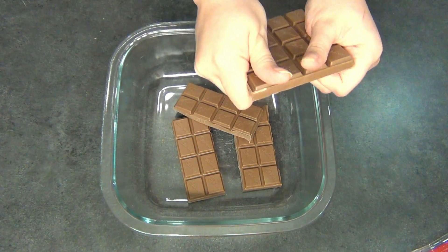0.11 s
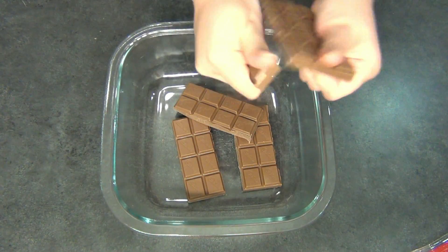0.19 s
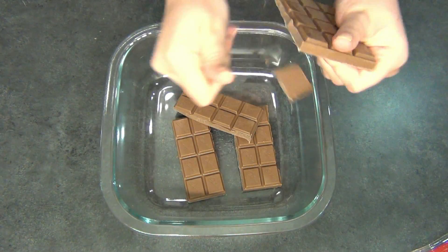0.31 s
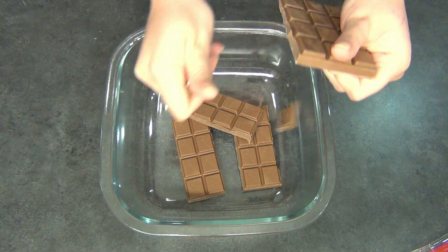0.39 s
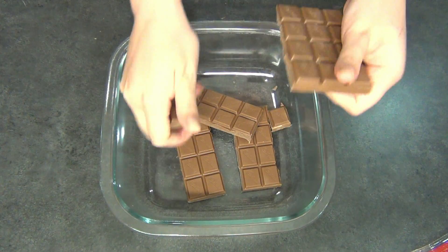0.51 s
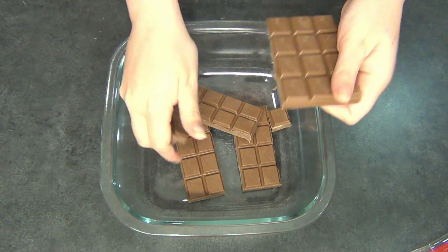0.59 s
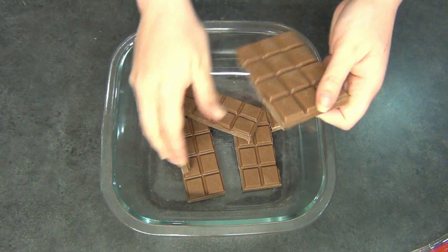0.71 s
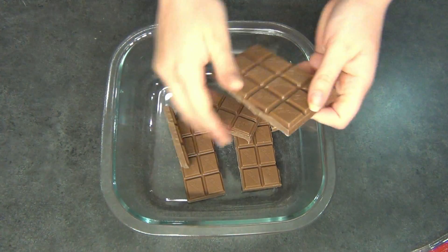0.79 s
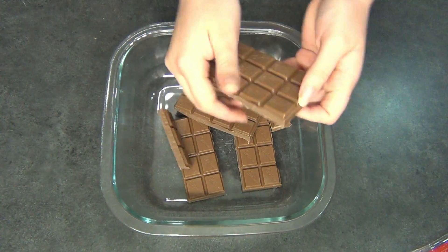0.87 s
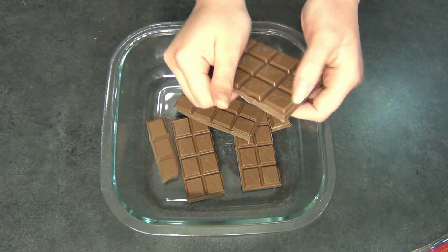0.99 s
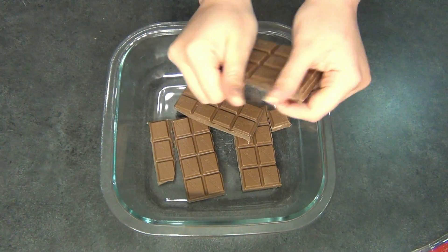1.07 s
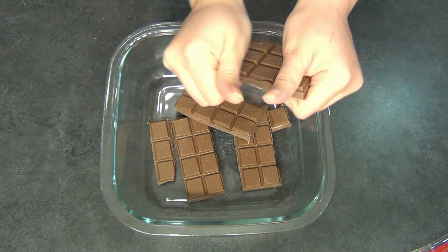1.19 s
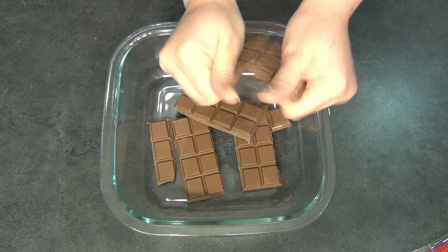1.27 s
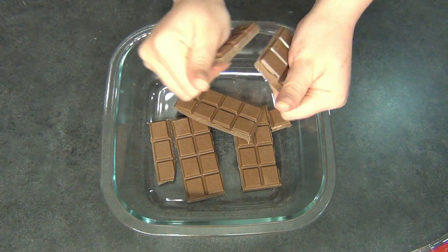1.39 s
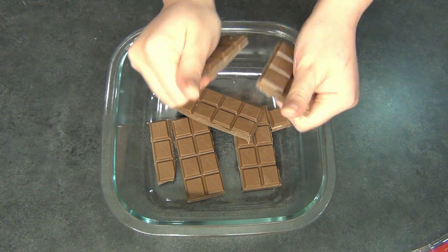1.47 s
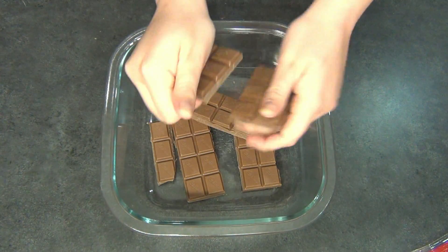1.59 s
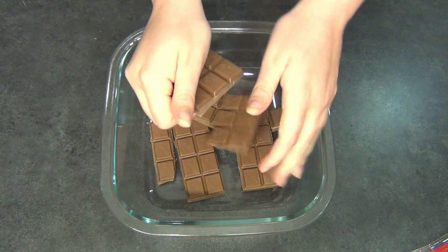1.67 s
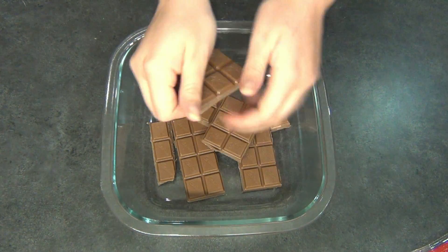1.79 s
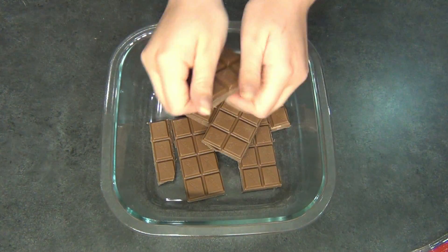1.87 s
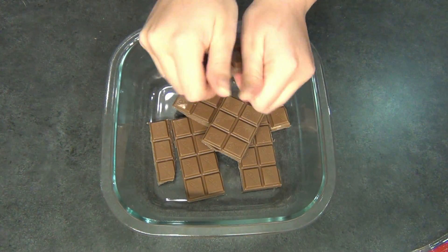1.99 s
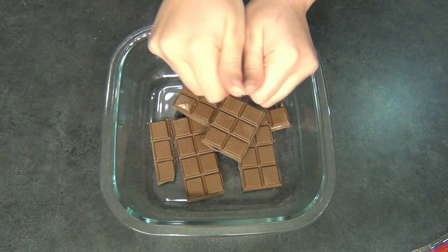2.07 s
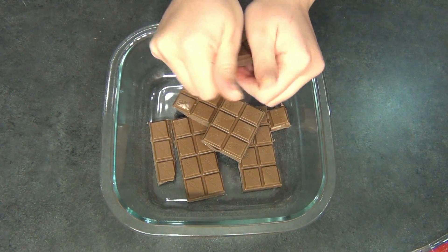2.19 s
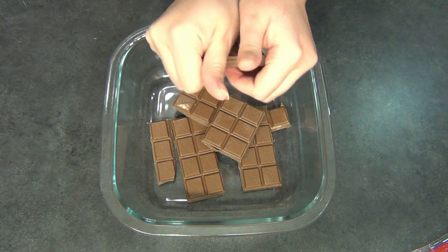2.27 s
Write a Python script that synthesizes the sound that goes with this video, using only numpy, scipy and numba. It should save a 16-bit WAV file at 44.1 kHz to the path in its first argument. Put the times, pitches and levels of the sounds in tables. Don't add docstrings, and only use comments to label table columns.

```python
import sys
import numpy as np
from scipy import signal
from scipy.fft import rfft, irfft
from scipy.io import wavfile
from numba import njit

SR = 44100
rng = np.random.default_rng(int(sys.argv[2]) if len(sys.argv) > 2 else 0)


def convert_level_to_amplitude(level_db):
    exponent = np.asarray(level_db, float) / 20
    return 10 ** exponent


def master_out(mix):
    frames = np.transpose(np.atleast_2d(mix))
    ceiling = np.clip(frames, -1, 1)
    pcm = np.round(ceiling * 32767).astype(np.int16)
    wavfile.write(sys.argv[1], SR, pcm)


N = 101430

# pitch_hz, level_db [dB per Hz]
AIR = [(25, -14), (76, -13.5), (170, 0.5), (249, -9), (317, -2), (591, -6.5), (863, -12), (2990, -23.5),
       (16000, -25.5)]
# pitch_hz, side_against_mid_db
AIR_WIDTH = [(100, -34), (380, -21.5), (1300, -5), (8000, -7.5), (15000, -10)]
# pitch_hz, level_db
FRIDGE_TONES = [(99, -57), (202, -53.5), (305, -65), (497, -103)]
# pitch_hz, level_db, t60_s
ROOM_OCTAVES = [(120, -4, 0.7), (234.4, -2.5, 0.53), (528, -0.5, 0.81), (953, -1.5, 0.96),
                (1822, -3.5, 0.85), (3600, -9.5, 0.78), (5230, -18, 0.85), (7500, -13.5, 0.63),
                (10500, -14, 0.31), (14400, -35.5, 0.25)]
# pitch_hz, level_db, t60_s
COUNTER_MODES = [(92.9, -12.5, 0.398), (158, -35, 0.035), (189.7, 0.5, 0.1), (220.5, 8.5, 0.051),
                 (261, 3.5, 0.075), (317, 0.5, 0.03), (469, 3.5, 0.021)]
# start_s, level_db
THUDS = [(0.484, -20), (0.511, -22.5), (.72, -21), (0.733, -24.5), (.756, -7.5), (0.78, -25.5),
         (.862, -13.5), (.925, -18), (0.969, -22.5), (1.027, -25), (1.075, -20.5), (1.132, -15.5),
         (1.147, -19.5), (1.2, -21), (1.757, -4.5), (1.781, -14), (1.798, -10), (1.836, -8)]
# start_s, level_db, centre_hz, t60_s
RATTLES = [(.477, -18.5, 10000, 0.18), (0.509, -23.5, 4760, 0.68), (0.768, -12.5, 2950, 0.31),
           (.86, -19.5, 2920, 0.57), (1.369, -31.5, 2620, 0.43), (.25, -30.5, 2780, 0.67),
           (1.097, -21.5, 2400, 0.26), (1.098, -9.5, 5600, 0.054), (1.761, -9.5, 3130, 0.069),
           (1.761, -18, 570, 0.38), (1.812, -14.5, 3400, 0.12), (1.82, -26.5, 1580, 0.54)]
GLASS_HZ = [840, 1530, 1590, 1696, 2370, 2862, 3095, 3938, 4510, 5060, 5430, 5740, 6600, 8270]
TWIN_SPLIT = [0.00043, 0.0025, .004, 0.0013, 0.001, 0.0022, 0.0033, 0.01, 0.0037, 0.0031, 0.0049, 0.0039,
              .003, .003]
# level_db, t60_s
BOTTOM_ANSWER = [(-33, 0.14), (-10, 0.61), (-27, 0.48), (2, 0.11), (-6, 0.14), (-8, 0.31), (-18, 0.12),
                 (7.5, 0.052), (-26, 0.22), (-23, 0.18), (-23, 0.25), (-31, .25), (-32, 0.32), (-26, 0.08)]
# level_db, t60_s
WALL_ANSWER = [(-1, 0.74), (-37, 0.5), (-18, 0.48), (-28, 0.2), (10, 0.15), (-5.5, 1.3), (-10, 0.46),
               (-18, 0.3), (-9, 0.4), (-3.5, 0.51), (-14, 0.68), (-13, 0.53), (-21, 0.33), (-32, 0.2)]
# pitch_hz, level_db, t60_s
SHIMMER_MODES = [(4470, -7, 0.11), (4810, -8, 0.13), (6150, -7.5, 0.22), (7040, -19, 0.095),
                 (7240, -11, 0.3), (8100, -7, 0.082), (8580, -6.5, 0.15), (9400, -19, 0.21),
                 (9800, -4.5, 0.12), (10300, -19, 0.091), (11500, -10, 0.094), (12400, -6, 0.1)]
# pitch_hz, level_db, t60_s
BOTTOM_CLACK = [(1571, 0, 0.017), (2270, -65, 0.0092), (2953, 0.5, 0.017), (3927, 0.5, 0.014),
                (4480, -18, 0.052), (5910, -19, 0.042), (7960, -11.5, 0.013), (10000, -31, 0.026),
                (12740, -43, 0.037), (13500, -39, 0.0067)]
# pitch_hz, level_db, t60_s
WALL_CLACK = [(1640, -28, 0.052), (2270, -10.5, 0.041), (2848, -7.5, 0.1), (3954, 3, 0.043),
              (5020, -12.5, 0.054), (5700, -13, 0.047), (9200, -39, 0.027), (9970, -21.5, 0.032),
              (12500, -28, 0.04), (14300, -40, 0.065)]
# start_s, level_db, pitch_hz
CLICKS = [(.2409, 3, 9100), (1.3633, 4, 11000), (0.48, -16, 4000), (0.5103, -6, 3030),
          (0.7365, -6, 3000), (0.7573, -15, 4000), (0.7637, -21, 5000), (.7668, -10, 5000),
          (0.8585, -1.5, 4000), (1.0942, -8, 4000), (1.7586, -3, 4000), (1.762, -5, 4000),
          (1.8099, 8.5, 4400), (1.8125, -3, 3500), (1.824, -13, 5000)]
# start_s, clack_db, tilt_db [per octave], glass_ring_db, tick_db
DROPS = [(.4687, 4.5, -1.5, -14.5, -12), (.7346, -0.5, -6, -36, -14), (.7546, 6, 1, -10, -18),
         (.762, 3.5, 4, -45, -3), (.766, 7.5, 0, -11, -2.5), (.8573, 6.5, 4, -16, -28),
         (.928, -29, -27, -41, -6), (1.0938, 6.5, 3.5, -16.5, -4), (1.1292, -13, -11, -34, -17),
         (1.147, -16, 3, -37, -8), (1.7578, -3.5, -16, -21, 2), (1.762, 5, 0, -43, -9),
         (1.767, -2, -9, -16, 4.5), (1.809, -6, 3, -25.5, -8), (1.8122, 2, 1, -12, -15),
         (1.823, -2, 7, -30, -5), (1.819, -9, 7.5, -47, -12), (1.828, -9, -9, -48, -12)]
# start_s, clack_db, tilt_db [per octave], glass_ring_db, tick_db
WALL_HITS = [
    (.4762, 1.5, 6, -14.5, -3.5),
    (.5071, -3, -3.5, -40, -25),
    (.524, -25, 13, -42, 13),
]
# start_s, level_db, extra_room_db, knock_db, knock_hz, knock_room_db
SNAPS = [
    (0.2407, 7.5, 8, -15, 1880, 11),
    (1.3625, 7.5, 0, -11.5, 884, -2.5),
    (1.7875, 12.5, 8, -38, 2500, -4),
]
# pitch_hz, level_db, t60_s
FLEX_MODES = [(736, -4.5, 0.0056), (1400, -11, 0.014), (2650, 6.5, 0.0023)]
# start_s, level_db
CRUNCH = [
    (1.7874, 14.5),
    (1.812, -5),
    (1.824, 3),
]
# start_s, level_db, centre_hz
CRUMBS = [
    (0.2415, -27, 9100),
    (0.3021, -8.5, 3300),
    (1.761, -1.5, 8000),
    (.869, -19, 9000),
    (0.92, -18.5, 9000),
    (.96, -31, 9050),
    (1.001, -24, 11000),
    (1.076, -32, 11500),
    (2.013, -16, 11000),
]

HUM_DB = -47
ROOM_START_S, ROOM_RISE_S, ROOM_SIDE_DB = 0.0016, 0.004, -8
DIFFUSE_HZ = 3770
CHATTER_PER_S, CHATTER_T60_S, CHATTER_RING_DB = 830, 0.019, -2.5
TWIN_DB, LONE_HZ = -4.5, 1000
SMOTHER_S, SMOTHER_T60_S = 0.8, 0.34
SHIMMER_DB, GLASS_SEND_DB, CLACK_SEND_DB = -3.5, -4.5, -6.5
CLATTER_DB, CLATTER_HZ, CLATTER_S = -5.5, 3100, 0.0033
TICK_S, DULL_HZ = 0.002, 11000
SNAP_HZ, SNAP_S, CRUNCH_HZ, CRUNCH_S = 10900, 0.00287, 4360, 0.0036
TREBLE_HZ, LOW_CUT_HZ = 13300, 141
RIM_HZ, RIM_S, RIM_SIDE_DB = 2500, 0.0017, -17
SHELF_HZ, BASS_PAN_DB = 515, 3
LIMIT_DB, RATIO, ATTACK_S, RELEASE_S = -10.5, 1.95, 0.00018, 0.008
TOP_HZ = 15800


def lowpass(x, hz, order):
    return signal.sosfilt(signal.butter(order, hz, fs=SR, output="sos"), x)


def highpass(x, hz):
    return signal.sosfilt(signal.butter(2, hz, "high", fs=SR, output="sos"), x)


def band(x, hz, octaves):
    edges = [hz * 2 ** (-octaves / 2), min(hz * 2 ** (octaves / 2), 0.45 * SR)]
    return signal.sosfilt(signal.butter(2, edges, "band", fs=SR, output="sos"), x)


def decay(t, t60):
    return np.exp(-np.log(1000) * t / t60)


def add(out, start_s, x):
    i = int(start_s * SR)
    out[:, i:i + x.shape[-1]] += x[..., :N - i]


def direct_and_send(send_db):
    return convert_level_to_amplitude([[0], [send_db]])


def left_right(side):
    return side * np.array([[1], [-1]])


def ring(modes, db, tilt_db=0.0, push_s=0.00055):
    hz, level_db, t60 = np.array(modes).T
    t = np.arange(int(SR * min(t60.max(), 0.6))) / SR
    strength, detune, sign = rng.standard_normal((len(hz), 3)).T
    gain = np.sign(sign) * convert_level_to_amplitude(db + level_db + tilt_db * np.log2(hz / 2500) + 2 * strength)
    hz = hz * (1 + 0.0002 * detune / t60)
    waves = np.sin(2 * np.pi * hz[:, None] * t) * decay(t, t60[:, None])
    return (gain @ waves) * (1 - np.exp(-t / push_s)) / 2


def crack(db, hz, length_s, octaves=2.1):
    grain, grain_db = rng.standard_normal((2, 1024))
    t = np.arange(1024) / SR / length_s
    burst = band(grain * convert_level_to_amplitude(1.5 * grain_db), hz, octaves)
    burst = convert_level_to_amplitude(db) * burst / burst.std() * t ** 0.5 * np.exp(-2.2 * t)
    even = band(1.0 * (t == 0), hz, octaves)
    even = even * np.sqrt((burst ** 2).sum() / (even ** 2).sum())
    return np.array([burst, even])


def hum():
    f = np.arange(N // 2 + 1) * SR / N + 1
    t = np.arange(N) / SR
    air_hz, air_db = np.transpose(AIR)
    width_hz, width_db = np.transpose(AIR_WIDTH)
    shape = convert_level_to_amplitude(np.interp(np.log(f), np.log(air_hz), air_db))
    wide = convert_level_to_amplitude(np.interp(np.log(f), np.log(width_hz), width_db))
    mid, side = irfft(rfft(rng.standard_normal((2, N))) * [shape, shape * wide], N)
    out = (mid + left_right(side)) * convert_level_to_amplitude(HUM_DB) / mid.std()
    for hz, db in FRIDGE_TONES:
        drift = np.cumsum(rng.standard_normal(N)) * 0.021
        out = out + convert_level_to_amplitude(db) * np.sin(2 * np.pi * hz * t + drift)
    return out


def room(send):
    t = np.arange(SR) / SR
    tail = 0
    for hz, db, t60 in ROOM_OCTAVES:
        noise = band(rng.standard_normal((2, SR)), hz, 1) * decay(t, t60)
        width = np.array([[1], [min(hz / DIFFUSE_HZ, 1) ** 0.41]])
        tail = tail + convert_level_to_amplitude(db) * noise / np.sqrt(t60 * SR / 14) * width
    tail = tail * (1 - np.exp(-np.maximum(t - ROOM_START_S, 0) / ROOM_RISE_S))
    mid, side = signal.fftconvolve(send[None], tail, axes=1)[:, :N]
    return mid + convert_level_to_amplitude(ROOM_SIDE_DB) * left_right(side)


def thuds():
    out = np.zeros((2, N))
    for s, db in THUDS:
        add(out, s, ring(COUNTER_MODES, db, push_s=0.0026))
    return out


def rattles():
    out = np.zeros((2, N))
    t = np.arange(SR // 2) / SR
    pitches = GLASS_HZ + [6100, 7490, 8700, 9900, 10800, 11800]
    modes = [(hz, 0, CHATTER_T60_S) for hz in pitches]
    for s, db, hz, t60 in RATTLES:
        chance, sign, force = rng.random((3, len(t)))
        hits = (chance < CHATTER_PER_S / SR) * np.sign(sign - 0.5) * convert_level_to_amplitude(-2.5 * np.log(force))
        pings = band(signal.fftconvolve(hits, ring(modes, 0))[:len(t)], hz, 0.67)
        grit = band(hits + 0.16 * rng.standard_normal(len(t)), hz, 0.49)
        chatter = grit / grit.std() + convert_level_to_amplitude(CHATTER_RING_DB) * pings / pings.std()
        add(out, s, convert_level_to_amplitude(db - 5.5) * chatter * decay(t, t60))
    return out


def clicks():
    out = np.zeros((2, N))
    for s, db, hz in CLICKS:
        u = (np.arange(64) - 32) / SR * hz * np.pi
        add(out, s - 32 / SR, -convert_level_to_amplitude(db) * (1 - 2 * u ** 2) * np.exp(-u ** 2))
    return out


def glass_ring(answer, start_s, db, push_s):
    modes = np.c_[GLASS_HZ, answer]
    hz, level_db, t60 = modes.T
    twin_db = level_db + TWIN_DB - 20 * (hz < LONE_HZ)
    twins = np.c_[hz * (1 + np.array(TWIN_SPLIT)), twin_db, t60]
    x = ring(np.r_[modes, twins], db, push_s=push_s)
    late = np.maximum(start_s + np.arange(len(x)) / SR - SMOTHER_S, 0) * (start_s < SMOTHER_S)
    return x * decay(late, SMOTHER_T60_S)


def landings(hits, clack, answer, push_s):
    out = np.zeros((2, N))
    for s, db, tilt_db, ring_db, tick_db in hits:
        add(out, s, ring(clack, db, tilt_db) * direct_and_send(CLACK_SEND_DB))
        add(out, s, glass_ring(answer, s, ring_db, push_s) * direct_and_send(GLASS_SEND_DB))
        add(out, s, ring(SHIMMER_MODES, ring_db + SHIMMER_DB) * direct_and_send(GLASS_SEND_DB))
        add(out, s, crack(db + CLATTER_DB, CLATTER_HZ * 2 ** (tilt_db / 20), CLATTER_S, 1.0))
        add(out, s, crack(db + CLATTER_DB - 2.0, 1110, CLATTER_S, 4.0))
        add(out, s, crack(db + tick_db, 7300, TICK_S, 0.97))
    return out


def drops():
    bottom = landings(DROPS, BOTTOM_CLACK, BOTTOM_ANSWER, 0.002)
    wall = landings(WALL_HITS, WALL_CLACK, WALL_ANSWER, 0.006)
    return lowpass(bottom + wall, DULL_HZ, 1)


def snaps():
    out = np.zeros((2, N))
    for s, db, room_db, knock_db, knock_hz, knock_room_db in SNAPS:
        add(out, s, crack(db, SNAP_HZ, SNAP_S) * direct_and_send(room_db))
        knock_s = s + SNAP_S / 3
        knock_level = db + knock_db
        send = direct_and_send(knock_room_db)
        flex = ring(FLEX_MODES, knock_level + 6.5, 8 * np.log2(knock_hz / 1300))
        add(out, knock_s, flex * np.array([[1], [0.15]]))
        add(out, knock_s, crack(knock_level, knock_hz, SNAP_S, 1.5) * send)
        add(out, knock_s, crack(knock_level - 0.5, 3 * knock_hz, SNAP_S, 0.69) * send)
    for s, db in CRUNCH:
        add(out, s, crack(db, CRUNCH_HZ, CRUNCH_S, 0.42))
    for s, db, hz in CRUMBS:
        add(out, s, crack(db, hz, TICK_S))
    return out


def rim_glints(near):
    rim = rng.standard_normal(256) * np.exp(-np.arange(256) / SR / RIM_S)
    rim = highpass(rim, RIM_HZ)
    rim = rim / np.sqrt((rim ** 2).sum())
    return left_right(convert_level_to_amplitude(RIM_SIDE_DB) * np.convolve(near, rim)[:N])


def scene():
    dry = thuds() + rattles() + clicks() + drops() + snaps()
    near, send = highpass(lowpass(dry, TREBLE_HZ, 2), LOW_CUT_HZ)
    x = near + rim_glints(near) + room(send)
    bass = lowpass(x, SHELF_HZ, 1)
    pan = convert_level_to_amplitude(left_right(0.5 * BASS_PAN_DB))
    return x + bass * (pan - 1) + hum()


@njit
def gain_control(x, top, ratio, attack, release):
    gain, level = np.ones(len(x)), 1e-9
    for i in range(len(x)):
        level += (x[i] - level) * (attack if x[i] > level else release)
        if level > top:
            gain[i] = (top / level) ** (1 - 1 / ratio)
    return gain


def roll_off(x):
    return signal.sosfilt(signal.butter(12, 16990, fs=SR, output="sos"), x)


def record(dry):
    peaks = np.abs(dry).max(axis=0)
    gain = gain_control(peaks, float(convert_level_to_amplitude(LIMIT_DB)), RATIO, 1 / (ATTACK_S * SR), 1 / (RELEASE_S * SR))
    x = np.tanh(dry * gain / 1.146) * 0.75
    x = signal.sosfilt(signal.ellip(8, 0.2, 50, TOP_HZ, fs=SR, output="sos"), x)
    return roll_off(x)


dry = scene()
out = record(dry)
master_out(out)
```